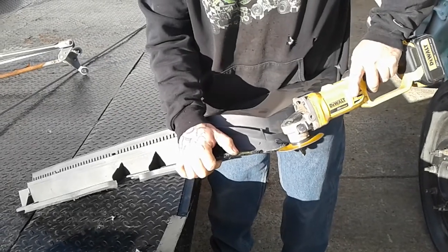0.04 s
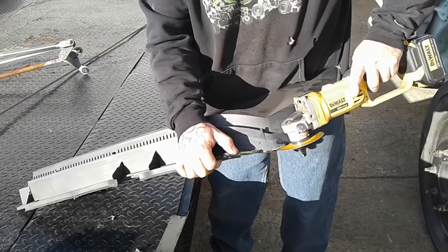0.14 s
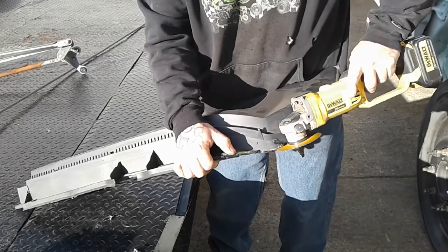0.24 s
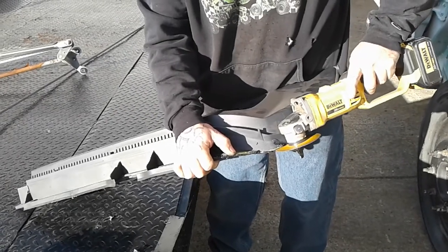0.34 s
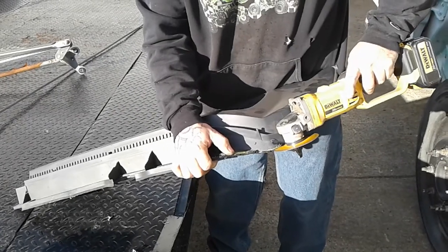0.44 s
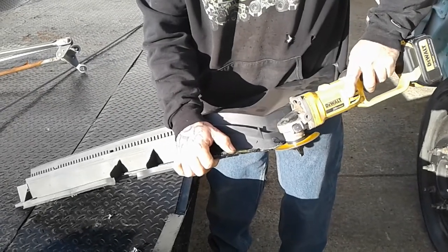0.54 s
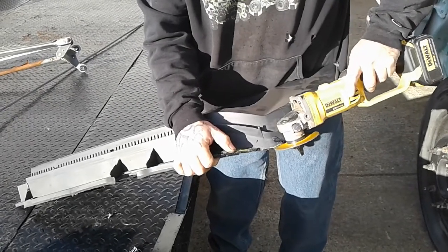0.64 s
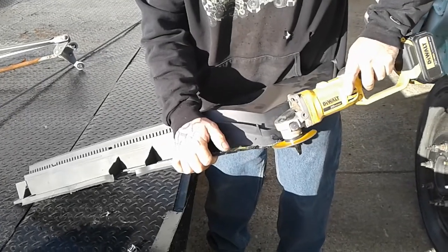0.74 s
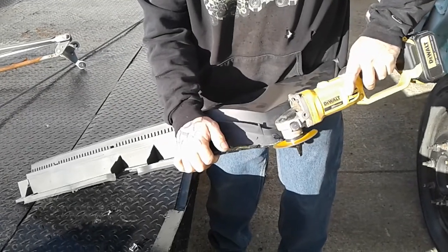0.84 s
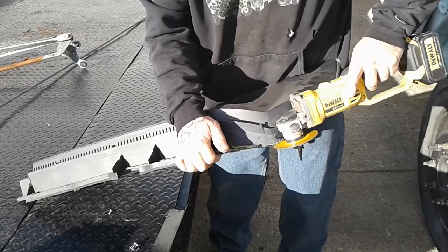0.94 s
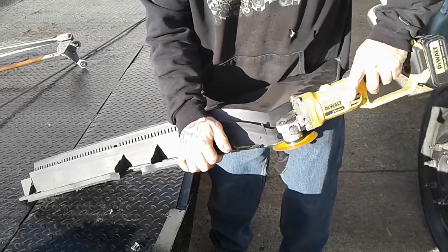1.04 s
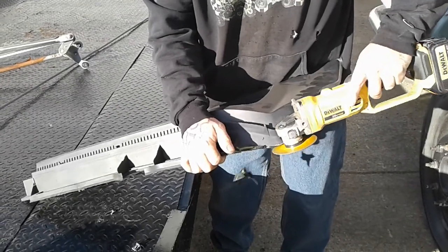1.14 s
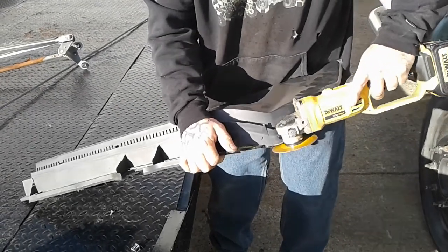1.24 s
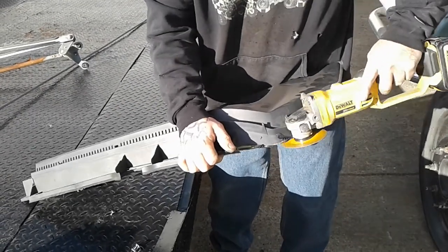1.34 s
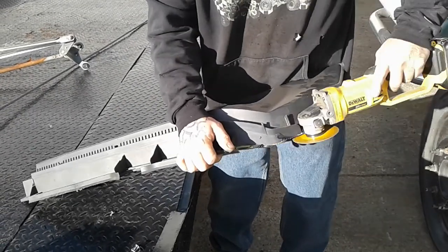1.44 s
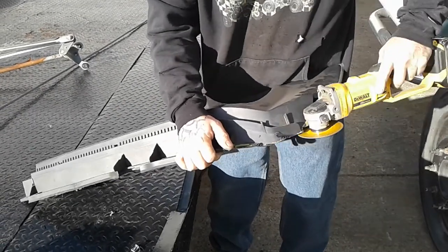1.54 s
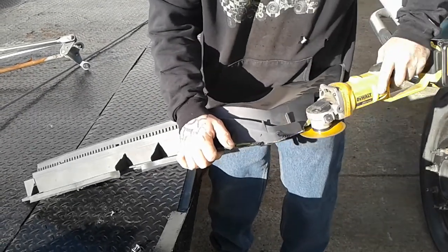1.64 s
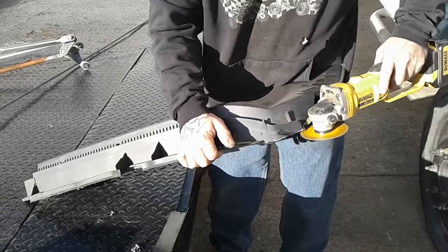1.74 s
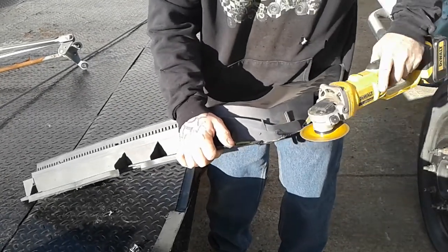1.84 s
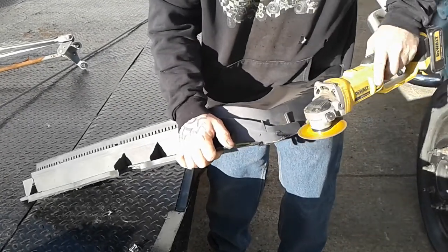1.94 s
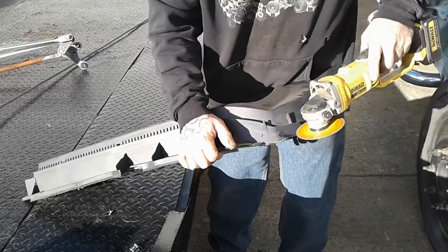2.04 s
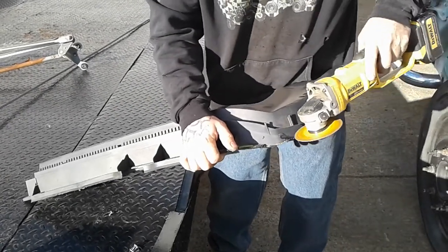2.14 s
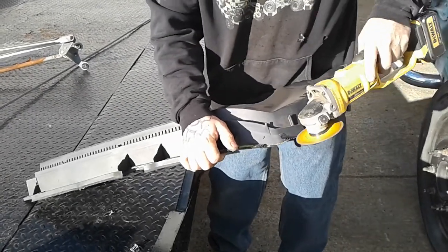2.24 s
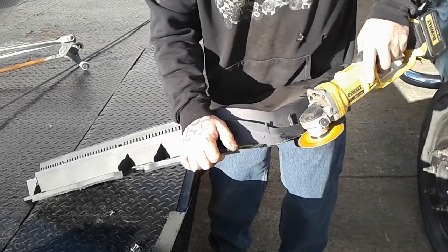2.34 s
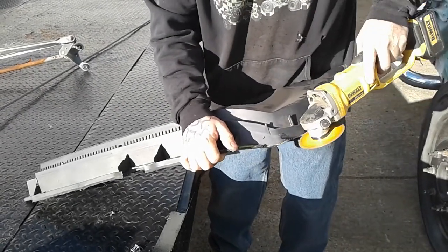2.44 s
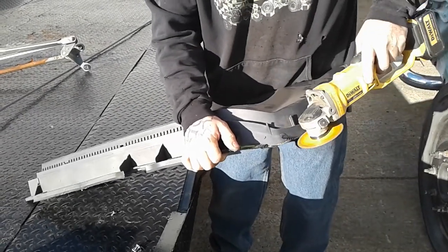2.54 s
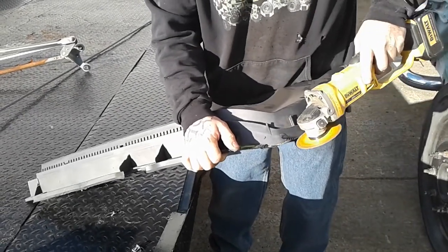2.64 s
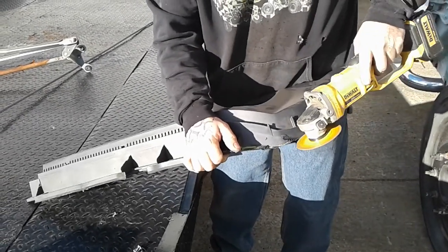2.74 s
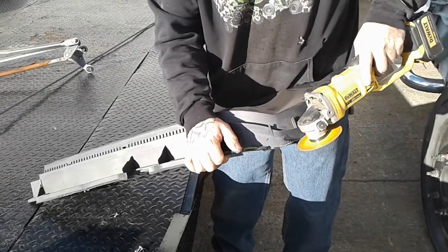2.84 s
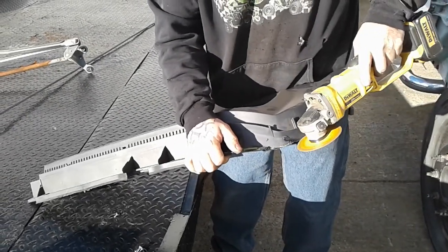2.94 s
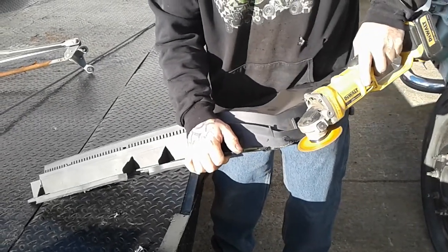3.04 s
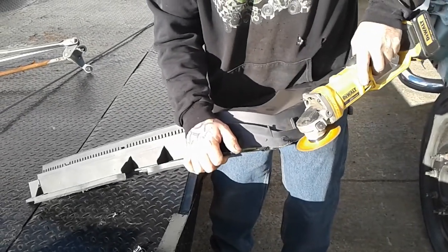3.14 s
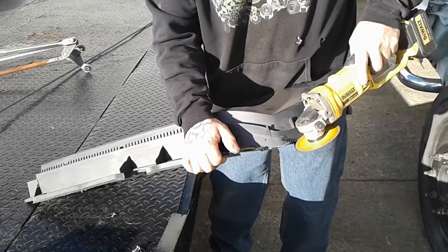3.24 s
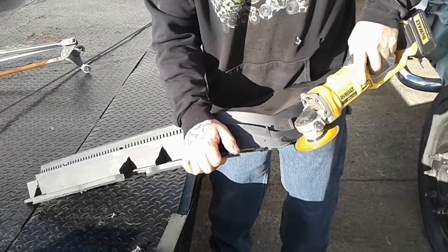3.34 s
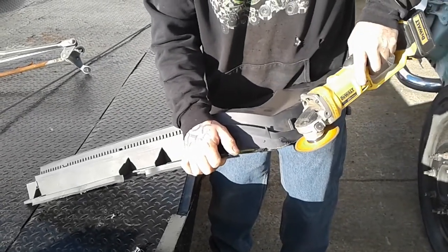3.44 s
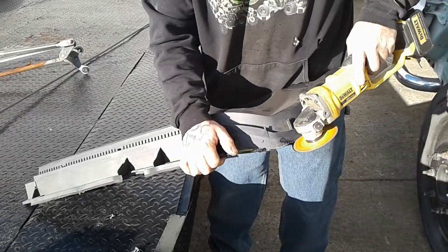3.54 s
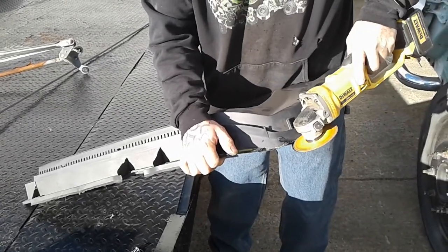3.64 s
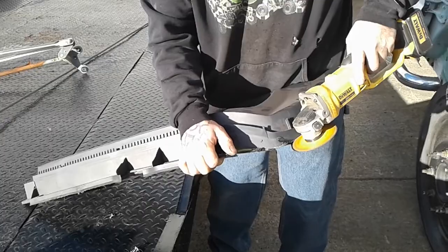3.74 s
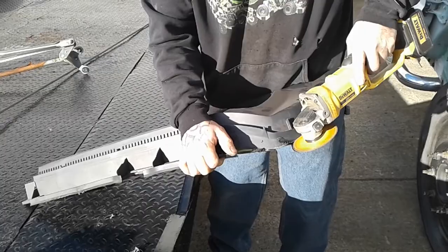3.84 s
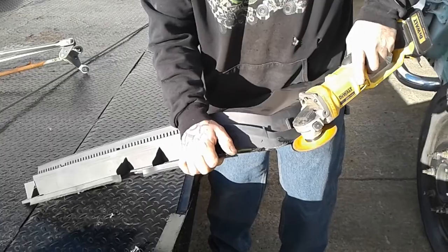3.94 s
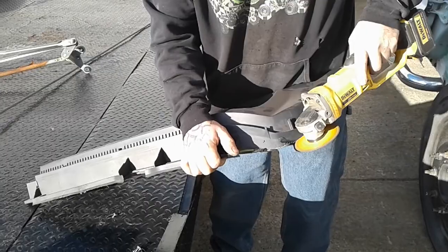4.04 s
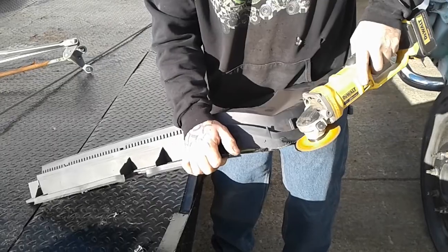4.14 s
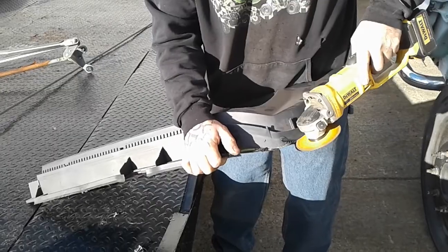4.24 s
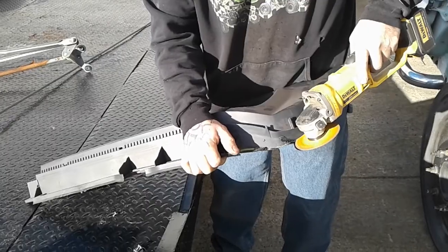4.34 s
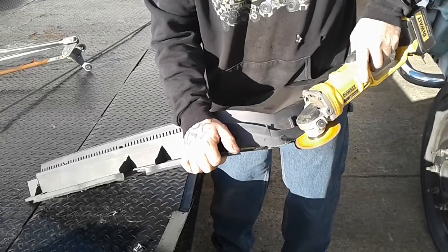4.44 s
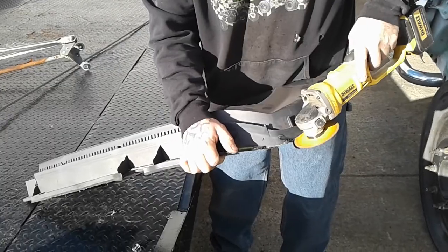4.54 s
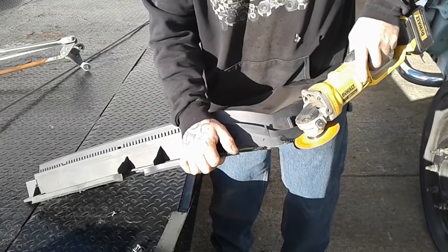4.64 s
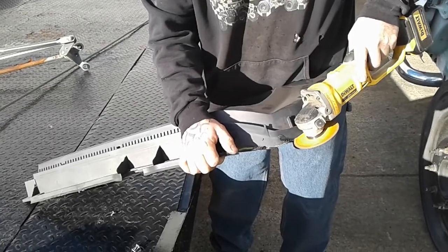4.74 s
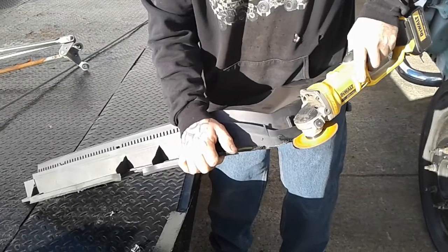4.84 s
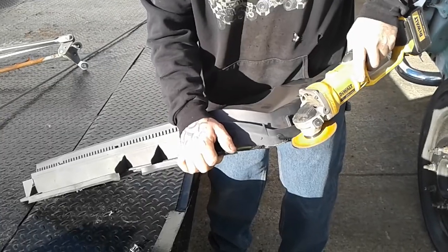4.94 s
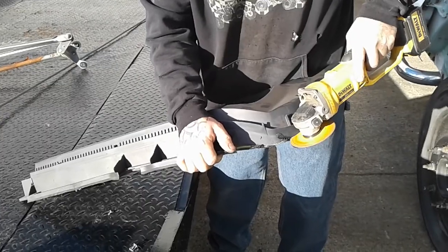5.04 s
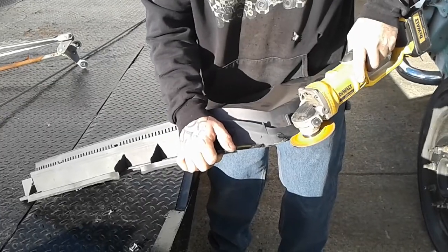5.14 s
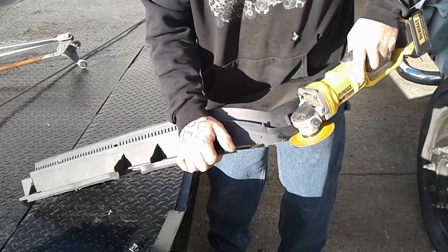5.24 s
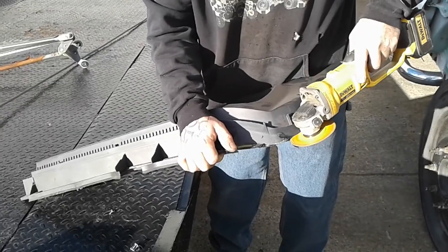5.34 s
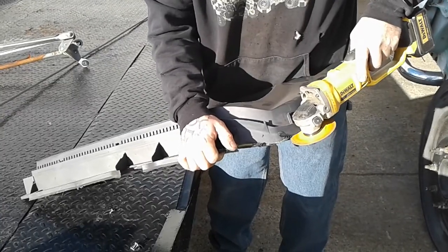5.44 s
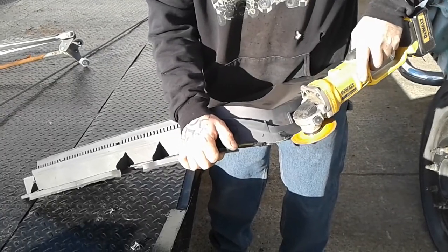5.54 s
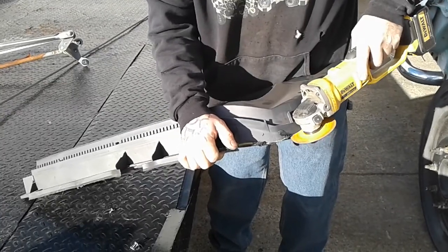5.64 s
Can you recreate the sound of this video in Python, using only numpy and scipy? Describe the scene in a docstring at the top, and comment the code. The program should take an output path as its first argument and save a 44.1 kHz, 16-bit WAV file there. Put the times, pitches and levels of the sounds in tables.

```python
"""First a harsh buzz and hiss: outdoors, a cordless angle grinder cuts a plastic panel, runs free, then bites again.
The uneven rim rubs one pattern into the panel every turn, and load sags the speed that sets every pitch.
Torn plastic rasps, swarf hisses and ticks, the cut edge rings, gears and motor whine, the fan blows and whistles.
Off the panel the gears rattle, the rim scuffs and ticks on the edge, and a thin ring chirps.
Two microphone ports hear it with near reflections; a breeze bumps both, the left one harder."""
import sys
import numpy as np
from scipy import signal
from scipy.fft import rfft, irfft
from scipy.io import wavfile
from scipy.ndimage import uniform_filter1d, map_coordinates

SR = 44100
rng = np.random.default_rng(int(sys.argv[2]) if len(sys.argv) > 2 else 0)


def master_out(mix):
    """Clip the mix to full scale and print it as 16-bit PCM to the path in sys.argv[1]."""
    frames = np.transpose(np.atleast_2d(mix))
    ceiling = np.clip(frames, -1, 1)
    pcm = np.round(ceiling * 32767).astype(np.int16)
    wavfile.write(sys.argv[1], SR, pcm)


N = 251370
TIME = np.arange(N) / SR
BINS = np.fft.rfftfreq(N, 1 / SR)

# Course of the disc's speed, before inertia rounds it. Each row: time in seconds, turns per second.
SPEED_COURSE = [(0, 83.5), (.42, 93.4), (.68, 91.3), (.8, 89.8), (.99, 90.3), (1.28, 99.9), (1.6, 104.2),
                (2.15, 106.4), (2.52, 104.7), (2.8, 102.0), (3.51, 87.6), (3.82, 85.25), (4.14, 86.0),
                (4.54, 87.55), (4.92, 86.15), (5.29, 80.0), (5.7, 81.3)]
# The rotor's inertia rounds speed changes; load is 0 at the free rate, 1 at the loaded rate (turns per second).
INERTIA_S, FREE_RATE, LOADED_RATE = .1, 106, 86
# Disc in the panel. Each row: start in seconds, end in seconds.
CUTS = [(0.0, 1.095), (2.503, 5.7)]

# How well the panel radiates. Each row: frequency in Hz, relative level in dB.
PANEL_RESPONSE = [(85, -37.7), (170, -26), (770, -26), (1020, -3.0), (1250, -8.4), (1480, -4.8),
                  (1680, -20.6), (2000, -5.0), (2450, 0.0), (2780, -7.7), (3020, -5.3), (3550, -10.5),
                  (4000, -17.1), (12000, -36.0)]
# What stands out of the rim's pattern in each hold of the disc. Each row: multiple of the turn, lift in dB.
FIRST_CUT_LINES = [(9, 6), (11, -3), (12, -3), (17, 4), (18, 6), (21, -5), (22, -5), (23, 2), (24, 3),
                   (25, -4), (27, 7), (28, 2), (30, -5), (34, 1), (35, -5)]
BITING_IN_LINES = [(12, 5), (15, 4), (16, -8), (17, 7), (18, 6), (19, -8), (20, -5), (21, -8), (23, 5),
                   (24, 3), (25, 2), (26, -6), (27, -4), (28, -4), (29, 10), (30, 5), (31, -6), (41, 6),
                   (42, 9)]
SINKING_LINES = [(6, 7), (8, 8), (9, -4), (12, 3), (13, 11), (14, -5), (15, 8), (20, 4), (22, -8), (23, 3),
                 (24, 3), (25, 2), (28, -13), (29, -7), (30, -4), (34, -8), (35, -7), (36, -7)]
CHEWING_LINES = [(7, 4), (10, -10), (13, 2), (14, -5), (15, -8), (16, 3), (17, 3), (23, 4), (24, 4),
                 (27, 4), (28, -14), (31, -4), (33, -5), (36, -3), (37, -8), (38, 5), (41, -4), (43, -6)]
DEEP_CUT_LINES = [(10, -14), (12, 4), (14, 2), (17, 6), (18, 3), (21, -4), (23, 6), (25, -2), (26, -5),
                  (27, -4), (28, -4), (29, 4), (30, 6), (31, -4), (33, -4), (34, -5), (35, -4), (36, 4),
                  (37, 3), (41, 9), (43, -7), (44, -8)]
DRAGGING_LINES = [(11, 4), (12, 8), (13, 4), (14, 7), (16, -12), (20, 6), (22, 4), (23, 13), (24, -5),
                  (25, 2), (27, 5), (29, 6), (35, 3), (38, -6), (40, 5), (46, 9)]
SLIPPING_LINES = [(8, 7), (9, 6), (10, 3), (12, 4), (13, 4), (16, -7), (18, 5), (21, 4), (22, 5), (23, 3),
                  (24, 5), (28, -11), (33, -3), (35, -4), (36, -7), (42, 4)]
WEDGED_LINES = [(11, 5), (13, -4), (16, -3), (17, -7), (19, -5), (23, 5), (25, -6), (27, 4), (28, -13),
                (31, 2), (33, 5), (35, 8), (36, 10), (37, -4), (38, 6), (42, 6), (45, 8), (46, 5)]
HOLD_PATTERNS = [FIRST_CUT_LINES, BITING_IN_LINES, SINKING_LINES, CHEWING_LINES,
                 DEEP_CUT_LINES, DRAGGING_LINES, SLIPPING_LINES, WEDGED_LINES]
# Way the disc is held. Each row: time in seconds, hold as an index into HOLD_PATTERNS (fractions blend),
# share of the turn in contact (0-1).
HOLD_COURSE = [(0, 0, .65), (.25, 0, .42), (.58, 0, .45), (.75, 0, .65), (1.15, 0, .8), (2.5, 1, .3),
               (2.76, 1, .33), (2.98, 2, .58), (3.28, 2, .6), (3.44, 3, .7), (3.66, 3, .88), (3.84, 4, .88),
               (4.15, 4, .85), (4.34, 5, .65), (4.68, 5, .62), (4.82, 6, .7), (5.02, 6, .75),
               (5.26, 7, .62), (5.7, 7, .72)]
# How hard the hand presses, one curve a cut. Each row: time in seconds, buzz level in dB before its trim.
PRESS_CURVES = [
    [(0.0, -20), (0.25, -16), (0.47, -15), (.7, -17), (0.88, -19), (1.02, -21.5), (1.1, -26)],
    [(2.52, -16), (2.66, -15), (2.86, -18), (3.1, -16), (3.55, -14.5), (3.97, -13), (4.3, -15.5),
     (4.6, -13.5), (4.8, -16), (5.05, -18), (5.2, -18), (5.4, -18.5), (5.62, -16), (5.7, -18.5)],
]
# The rim's multiples drift in level (dB) and slip in phase (radians).
DRIFT_DB, SLIP_RAD = 3, .45

# Swarf thrown. Each row: time in seconds, hiss level at load 1 in dB before its trim.
SPRAY_COURSE = [(0, -27), (.14, -25), (.3, -28), (.41, -26), (.47, -23.5), (.8, -25), (.95, -22.5),
                (1.1, -20), (2.5, -26), (2.8, -24), (3.2, -26.5), (3.45, -29), (4.3, -30.5), (4.8, -27),
                (5.7, -29.5)]
# Rasp of torn plastic. Each row: frequency in Hz, relative level in dB per Hz.
RASP_SPECTRUM = [(100, -39), (250, -17.5), (720, -6.5), (900, -5.5), (1480, -3), (1700, -10), (2100, -4.5),
                 (2450, 2), (2750, -3.5), (3050, -13), (4000, -35), (12000, -25.5)]
# Hiss of swarf. Each row: frequency in Hz, relative level in dB per Hz.
HISS_SPECTRUM = [(2120, -52), (3600, -14), (3800, 0.5), (4520, 7.5), (7190, -3), (7830, -1.5),
                 (8960, -12.5), (10900, -12), (12500, -17), (14500, -25), (15600, -40)]
# Load raises the hiss; its top is lifted, and brightens further for a while after each bite.
HISS_LOAD_DB, HISS_TOP_DB, BRIGHTEN_DB_PER_S, BRIGHTEN_S = 12, 7, 3, 1
# As the disc slides out of the first cut, rasp and hiss body fade while the hiss top lifts.
EXIT_S, EXIT_DB, EXIT_TOP_DB = 0.19, -12, 3.5
# Narrow sliding rings of the cut edge. Each row: start in seconds, length in seconds, first Hz, last Hz, level in dB.
EDGE_RING_EVENTS = [(0, .13, 5300, 5100, -32), (0, .25, 7900, 7900, -38), (.42, .3, 6300, 6700, -34),
                    (.9, .12, 6600, 6750, -33), (.55, .5, 9400, 9600, -41), (2.52, .62, 4330, 4300, -34),
                    (2.7, .35, 7050, 6800, -40), (2.72, .3, 12000, 11900, -48), (3.1, 1.6, 5750, 5750, -35),
                    (3.85, .6, 8100, 7800, -38), (4.7, .5, 8500, 7750, -37), (5.25, .45, 7700, 7850, -35),
                    (5.08, .55, 4250, 4200, -31), (4.75, .95, 10100, 9800, -42)]

# Hum of the loose panel. Each row: multiple of the turn, level in dB.
PANEL_HUM = [(2, -54), (3, -59), (4, -50)]
# The hum swells to a drone. Each row: start in seconds, length in seconds, multiple of the turn, level in dB.
DRONE_EVENTS = [(0.0, 0.54, 4, -45.5), (0.6, 0.39, 4, -68), (0.05, 0.47, 3, -47.5), (2.452, 0.21, 3, -49),
                (2.803, 1, 4, -50), (3.88, 0.36, 4, -41.5), (4.694, 1.0, 2, -49.5), (5.08, 0.06, 2, -38.5),
                (5.29, 0.36, 3, -49.5)]

# Fan air. Each row: frequency in Hz, relative level in dB per Hz.
FAN_SPECTRUM = [(100, -69), (300, -13), (720, -7.5), (1000, 8), (1200, 0.5), (1520, -1.5), (1780, -8),
                (2300, 4.5), (3400, 8.5), (4300, -6.5), (5500, -8), (9000, -16.5), (12000, -23),
                (15500, -31)]
# Pitch of the fan's whistle, as a multiple of the disc's turn.
WHISTLE_MULTIPLE = 9.73
# Mesh of the crown gear's 32 teeth, pressed together by the load.
# Each row: multiple of the turn, level running free in dB, level at load 1 in dB.
GEAR_TONES = [(32, -40, -34), (64, -58, -49), (96, -66, -56)]
# Motor tones. Each row: multiple of the disc's turn, level running free in dB, level at load 1 in dB.
MOTOR_TONES = [(24.889, -56, -44), (28.444, -50, -38), (60.444, -68, -58), (85.333, -57, -58)]
# One multiple of gear mesh or rim sings out.
# Each row: start in seconds, length in seconds, multiple of the turn, level in dB.
SQUEAL_EVENTS = [(0.0, 0.043, 23, -25), (0.0, 0.05, 29, -21), (0.208, 0.07, 32, -26),
                 (0.654, 0.16, 32, -26), (0.62, 0.12, 34, -35), (0.884, 0.15, 34, -25.5),
                 (1.043, 0.17, 32, -31), (2.557, 0.052, 29, -20), (2.717, 0.28, 32, -27),
                 (2.952, 0.11, 32, -23.5), (3.21, 0.14, 32, -22), (3.83, 0.19, 32, -30),
                 (3.85, 0.13, 64, -36), (4.22, 0.09, 60, -35), (4.392, 0.15, 66, -34),
                 (4.954, 0.11, 32, -23.5), (4.957, 0.032, 64, -28), (5.153, 0.022, 64, -23),
                 (5.258, 0.45, 32, -23), (5.31, 0.092, 64, -29), (5.13, 0.63, 96, -43)]
# Gear rattle. Each row: frequency in Hz, relative level in dB per Hz.
RATTLE_SPECTRUM = [(300, -25), (1800, -9), (2400, -23), (2900, 6.5), (3400, 14), (3900, -1), (4600, 7),
                   (5300, -12), (6800, 1), (8000, -13.5), (11600, -14), (15000, -45)]
# Teeth rattle in their play while free. Each row: start in seconds, length in seconds, level in dB.
FREE_RATTLE_BURSTS = [(1.173, 0.059, -26.5), (1.347, 0.087, -26), (1.576, 0.081, -26), (1.695, 0.19, -32.5),
                      (1.92, 0.13, -30), (2.09, 0.58, -27)]
# Once-a-turn knock (depth 0-1), and the quick rise and fall of each burst.
RATTLE_KNOCK, RATTLE_RISE_S, RATTLE_FALL_S = .3, .018, .02
# Slower throb of the rattle: cycles per turn, depth 0-1, rms unevenness in cycles.
SWAY_PER_TURN, SWAY_DEPTH, SWAY_SLIP = .27, .35, .2

# Strength of the breeze. Each row: time in seconds, level in dB before each port's trim.
BREEZE_COURSE = [(0.0, -46), (1.05, -56), (1.2, -48), (2.3, -51.5), (2.5, -55.5), (4.2, -66.5), (5.7, -62)]
# Gusts on top of it. Each row: start in seconds, length in seconds, level in dB before each port's trim.
GUST_EVENTS = [(0.07, 0.14, -36.5), (0.442, 0.086, -35.5), (0.798, 0.068, -36.5), (1.436, 0.022, -45),
               (4.866, 0.23, -51.5)]
# Buffeting at the microphone. Each row: frequency in Hz, relative level in dB per Hz.
BUFFET_SPECTRUM = [(20, -28), (45, -5), (80, 1), (150, 4.5), (250, -2), (400, -2.5), (800, -11),
                   (2000, -60)]
# Faint outdoor rumble. Each row: frequency in Hz, relative level in dB per Hz.
OUTDOORS_SPECTRUM = [(25, -20), (60, 8.5), (100, 16), (200, -8), (400, 8), (1000, 2.5), (4000, -50)]

# Grazes of the edge between cuts. Each row: start in seconds, length in seconds, level in dB.
SCUFF_EVENTS = [(1.102, 0.033, -27), (1.17, 0.029, -33), (1.22, 0.022, -29), (1.35, 0.053, -29),
                (1.383, 0.026, -25.5), (1.618, 0.017, -21), (1.754, 0.0083, -17), (1.783, 0.038, -28.5),
                (2.084, 0.011, -30), (2.15, 0.0092, -25), (2.264, 0.013, -27.5), (2.342, 0.025, -17),
                (2.404, 0.043, -24), (2.472, 0.027, -23)]
# Colour of a graze. Each row: frequency in Hz, relative level in dB per Hz.
SCUFF_SPECTRUM = [(180, -57), (300, -7), (720, -2), (1050, 10.5), (1490, 17.5), (1670, 0.5), (2370, 18),
                  (2980, -1), (3350, 12.5), (4010, 8.5), (4290, 16), (5400, 3.5), (6370, 7), (10300, 1),
                  (15600, -12)]
# Bouts of chirping. Each row: start in seconds, length in seconds, level in dB.
CHIRP_BOUTS = [(1.434, 0.066, -46), (1.58, 0.066, -42), (1.71, .025, -42), (1.796, .05, -41),
               (1.91, .035, -46), (2, 0.034, -37), (2.087, .02, -41), (2.146, 0.025, -41),
               (2.197, 0.021, -37), (2.265, .025, -40), (2.32, .02, -40)]
# Sharp single ticks of the rim on the edge. Each row: time in seconds, level in dB.
TICK_EVENTS = [(1.462, -27), (1.482, -17.5), (1.544, -28), (1.622, -30), (1.637, -19), (1.712, -24),
               (1.759, -27), (2.086, -18), (2.124, -17), (2.146, -15.5), (2.243, -16), (2.264, -20),
               (2.309, -15)]
# Colour of a tick. Each row: frequency in Hz, relative level in dB per Hz.
TICK_SPECTRUM = [(300, -28), (1000, -7), (1800, -3), (2400, 8), (3400, 9), (4500, 6.5), (5500, -31),
                 (10000, -15), (15000, -34)]

# Balance of the two microphone ports. Each row: frequency in Hz, left minus right in dB.
PORT_PAN = [(100, 0.5), (500, 0), (800, 2.6), (1200, 4), (1800, -2.5), (2500, 0), (3300, -3), (4400, -9),
            (5600, -11), (7400, -15), (8700, -6), (10200, -7), (11800, -1), (14500, -5)]
# Phase between the ports. Each row: frequency in Hz, lead of the left in radians.
PORT_LEAD = [(100, -0.11), (1500, -0.43), (1900, -1.6), (2150, -0.97), (2750, -0.69), (3200, -1.58),
             (3900, -1.5), (7800, -1.37), (12000, -1.76)]
# Likeness of noise at the ports. Each row: frequency in Hz, likeness 0-1.
PORT_LIKENESS = [(100, 1), (1000, 0.87), (2500, 0.52), (4000, 0.19), (8000, 1), (15000, 0.76)]
# Upper band limit of the recorder.
BAND_LIMIT_HZ = 15750


def amp(db):
    """Decibels to gain."""
    return 10 ** (np.asarray(db) / 20)


def unit(x):
    """Scales to rms 1."""
    return x / np.sqrt(np.mean(x ** 2) + 1e-20)


def at_hz(points, hz):
    """Reads a spectrum on a log-frequency axis."""
    f, value = np.transpose(points)
    return np.interp(np.log(hz + 1), np.log(f + 1), value)


def at_time(rows, t=TIME):
    """Reads every column of a curve."""
    s, *columns = np.transpose(rows)
    return [np.interp(t, s, c) for c in columns]


def wander(rate, t=TIME):
    """Smooth chance of rms 1 that changes about rate times a second."""
    knots = rng.standard_normal(2048)
    steps = np.linspace(0, t[-1], min(len(t), 8192))
    curve = map_coordinates(knots, [steps * rate], order=2, mode="wrap")
    return unit(np.interp(t, steps, curve))


def swell(start, length, rise, fall):
    """Rises to 1 by start, holds for length, falls back to 0."""
    return np.clip(1 + np.minimum((TIME - start) / rise, (start + length - TIME) / fall), 0, 1)


def coloured(x, spectrum):
    """Gives x a spectrum, at rms 1."""
    return unit(irfft(rfft(x) * amp(at_hz(spectrum, BINS)), N))


def air(spectrum, drive=1):
    """Two partly alike channels of coloured noise whose strength follows drive."""
    a, b = rfft(rng.standard_normal((2, N)) * drive)
    alike = np.clip(at_hz(PORT_LIKENESS, BINS), 0, 1)
    side = b * np.sqrt((1 - alike) / (1 + alike))
    return coloured(irfft(np.array([a + side, a - side]), N), spectrum)


def speed():
    """Turns of the disc per second, rounded by the rotor's inertia."""
    return uniform_filter1d(at_time(SPEED_COURSE)[0], round(INERTIA_S * SR), mode="nearest")


def load():
    """How far the cut drags the speed down."""
    return np.maximum(FREE_RATE - speed(), 0) / (FREE_RATE - LOADED_RATE)


def disc_turns(jitter=0.00043, jitter_rate=45):
    """Angle of the disc in turns; small chance variations shake its speed."""
    return np.cumsum(speed() * (1 + jitter * wander(jitter_rate))) / SR


def contact(bite_s=0.008, lift_s=0.055):
    """1 while the disc is in the cut, 0 while it runs free."""
    return sum(swell(start, end - start, bite_s, lift_s) for start, end in CUTS)


def swarf_db():
    """Level of the abrasive hiss before its trim: it follows the spray, and load raises it."""
    return at_time(SPRAY_COURSE)[0] + HISS_LOAD_DB * (load() - 1)


def tone(turns, multiple, flutter=0.29, flutter_rate=40, shake_turns=0.0011, shake_rate=90):
    """One multiple of the turn, at rms 1; the shaft's shake blurs the high multiples most."""
    angle = turns + shake_turns * wander(shake_rate)
    return unit((1 + flutter * wander(flutter_rate)) * np.sin(2 * np.pi * multiple * angle))


def swelling(turns, steady, events, edge_s):
    """Multiples of the turn, each with a base gain and with swells that add their power to it."""
    power = {round(k): gain ** 2 for k, gain in steady}
    for start, length, k, db in events:
        event_gain = amp(db) * swell(start, length, edge_s, edge_s)
        power[round(k)] = power.get(round(k), 0) + event_gain ** 2
    return sum(np.sqrt(p) * tone(turns, k) for k, p in power.items())


def chips(per_s, decay_s):
    """Chips break off at random moments; each is a sudden kick that dies away."""
    kicks = (rng.random(N) < per_s / SR) * np.minimum(rng.exponential(1, N), 2)
    return signal.lfilter([1], [1, -np.exp(-1 / (decay_s * SR))], kicks + 1e-12)


def rim_buzz(turns, level_db=-1, treble_drift_db=7, treble_db=3, blur=1.0, blur_rate=40,
             drift_rate=4, slip_rate=12, shake=0.028, count=110, size=2048):
    """The rim's pattern repeats each turn and drifts; its multiples sweep through the panel's resonances."""
    t = TIME[::441]  # a fresh pattern every 10 ms
    order = np.arange(1, count + 1)
    hz = order[:, None] * np.interp(t, TIME, speed())
    hold, share = at_time(HOLD_COURSE, t)
    cut_db = at_time(np.vstack(PRESS_CURVES), t)[0]
    db = at_hz(PANEL_RESPONSE, hz)
    for i, pattern in enumerate(HOLD_PATTERNS):
        weight = np.maximum(1 - abs(hold - i), 0)
        for multiple, lift_db in pattern:
            db[round(multiple) - 1] += lift_db * weight
    # the finest features, above about 4 kHz, drift furthest and speak when much swarf is torn
    fine = 1 / (1 + (4000 / hz) ** 8)
    db += (DRIFT_DB + treble_drift_db * fine) * np.tanh([wander(drift_rate, t) for _ in order])
    swarf = np.interp(t, TIME, swarf_db())
    db += fine * (treble_db + swarf - swarf.mean())
    # a brief touch per turn keeps neighbouring multiples in step; a long contact scatters them
    steps = np.concatenate([rng.permutation(np.linspace(-.43, .43, 5)) for _ in order[::5]])
    phase = 2 * np.pi * np.cumsum(steps[:count, None], 0) * share
    phase += SLIP_RAD * np.array([wander(slip_rate, t) for _ in order])
    # the finest features, and all of them under a light touch, are blurred
    blurred = np.maximum(fine, 0.89 * (1 - share))
    phase += blur * blurred * np.array([wander(blur_rate, t) for _ in order])
    # the lowest multiples belong to the flapping, the 32nd to the gears
    kept = ~np.isin(order, [1, 2, 3, 4, 32])[:, None]
    lines = amp(db) * np.exp(1j * phase) * kept
    one_turn = irfft(np.vstack([0 * t, lines]).T, size)
    one_turn *= (amp(cut_db) / one_turn.std(axis=1))[:, None]
    # read across the table by the disc's angle, down it by time
    row = np.interp(TIME, t, np.arange(len(t)))
    buzz = map_coordinates(one_turn, [row, turns % 1 * size], order=1, mode="grid-wrap")
    return amp(level_db) * buzz * contact() * (1 + shake * wander(150))


def tearing_grit(turns, pulsing=0.5, chip_size=0.76, flake_size=0.36, flutter_db=1):
    """Strength of the tearing: it surges with each turn, most under a light touch, and kicks with each chip."""
    share = at_time(HOLD_COURSE)[1]
    per_turn = np.cos(2 * np.pi * turns) + .5 * np.cos(4 * np.pi * turns)
    surge = np.maximum(1 + pulsing * (1 - share) * per_turn, 0)
    small_chips = chip_size * chips(per_s=370, decay_s=0.000087)
    flakes = flake_size * chips(per_s=82, decay_s=0.00042)
    return surge * amp(flutter_db * wander(90)) * (1 + small_chips + flakes)


def leaving_cut():
    """Rises to 1 as the disc slides out of the first cut, then falls back."""
    return swell(CUTS[0][1], 0, EXIT_S, EXIT_S)


def rasp(grit, level_db=-4.0, deep_db=-1.0, body_deep_db=-8.5):
    """Grit tears the plastic: a rasp in the panel, weaker and thinner in a deep cut."""
    depth = np.minimum(at_time(HOLD_COURSE)[0] / 3, 1)
    press_db = at_time(np.vstack(PRESS_CURVES))[0]
    torn = air(RASP_SPECTRUM, grit) * amp(.5 * (press_db + swarf_db()) + level_db + deep_db * depth)
    body = irfft(rfft(torn) / (1 + (BINS / 1900) ** 8), N)  # below about 1.9 kHz
    thinned = torn - body + body * amp(body_deep_db * depth)
    return thinned * amp(EXIT_DB * leaving_cut()) * contact()


def swarf_hiss(grit, level_db=-1):
    """Thrown swarf hisses and ticks; the top brightens after each bite."""
    hiss = air(HISS_SPECTRUM, grit) * amp(swarf_db() + level_db)
    top = irfft(rfft(hiss) / (1 + (8000 / (BINS + 1)) ** 6), N)  # above about 8 kHz
    since_bite = sum((TIME - start) * (TIME >= start) * (TIME < end + EXIT_S) for start, end in CUTS)
    leaving = leaving_cut()
    brighten_db = BRIGHTEN_DB_PER_S * np.minimum(since_bite, BRIGHTEN_S)
    top_db = HISS_TOP_DB + brighten_db + EXIT_TOP_DB * leaving
    return ((hiss - top) * amp(EXIT_DB * leaving) + top * amp(top_db)) * contact()


def edge_rings(grit, width_share=0.055, edge_s=0.1):
    """Grit excites narrow resonances of the cut edge; they swell and fade, most sliding in pitch."""
    out = np.zeros((2, N))
    scrape = rng.standard_normal((2, N)) * grit
    for start, length, first_hz, last_hz, db in EDGE_RING_EVENTS:
        on = (TIME > start - edge_s) & (TIME < start + length + edge_s)
        hz = np.interp(TIME[on], [start, start + length], [first_hz, last_hz])
        carrier = np.exp(2j * np.pi * np.cumsum(hz) / SR)
        r = np.exp(-np.pi * width_share * first_hz / SR)
        # shift the sliding pitch to zero, low-pass, shift back: a moving resonance
        narrow = signal.lfilter([(1 - r) ** 2], [1, -2 * r, r * r], scrape[:, on] / carrier)
        ring = (carrier * narrow).real
        out[:, on] += amp(db) * swell(start, length, edge_s, edge_s)[on] * unit(ring + ring.mean(0))
    return out * contact()


def flap(turns, edge_s=0.068):
    """The panel's slowest bending follows the first multiples of the turn."""
    hum = [(k, amp(db) * contact()) for k, db in PANEL_HUM]
    return swelling(turns, hum, DRONE_EVENTS, edge_s)


def fan_air(level_db=-25.5):
    """Steady broad rush of the fan."""
    return amp(level_db) * air(FAN_SPECTRUM)


def whistle(turns, level_db=-35.5, load_db=-8, waver_db=2, waver_rate=35, eddy_rate=50, eddy=0.55):
    """The fan's wavering whistle, stronger the faster it spins; eddies roughen its tone."""
    eddies = 1 + eddy * (wander(eddy_rate) + 1j * wander(eddy_rate))
    note = unit((eddies * np.exp(2j * np.pi * WHISTLE_MULTIPLE * turns)).real)
    return note * amp(level_db + load_db * load() + waver_db * wander(waver_rate))


def whine(turns, edge_s=0.073):
    """Load strengthens the gear tones and most motor tones; single multiples swell into squeals."""
    strain = np.minimum(load(), 1)
    gears = [(k, amp(free + strain * (full - free))) for k, free, full in GEAR_TONES]
    motor = sum(amp(free + strain * (full - free)) * tone(turns, k) for k, free, full in MOTOR_TONES)
    return motor + swelling(turns, gears, SQUEAL_EVENTS, edge_s)


def gear_rattle(turns, level_db=-34, loaded_db=-10, throb_db=2, throb_rate=110):
    """Teeth rattle in their play, faintly in the cut and in bursts when the load is off."""
    knocks = amp(throb_db * wander(throb_rate)) * (1 + RATTLE_KNOCK * np.cos(2 * np.pi * turns))
    sway_cycles = SWAY_PER_TURN * turns + SWAY_SLIP * wander(8.25)
    knocks = knocks * (1 + SWAY_DEPTH * np.sin(2 * np.pi * sway_cycles))
    bursts = sum(amp(db) * swell(start, length, RATTLE_RISE_S, RATTLE_FALL_S)
                 for start, length, db in FREE_RATTLE_BURSTS)
    steady = amp(level_db + loaded_db * contact())
    return np.hypot(steady, bursts) * air(RATTLE_SPECTRUM, knocks)


def breeze(left_db=7, right_db=-5, lumpy_db=0.5, gust_rise_s=0.032, gust_fall_s=0.075):
    """Lumpy wind noise and gusts: one strength, but unrelated noise at the two ports."""
    lumps = amp(lumpy_db * wander(45))
    buffet = coloured(rng.standard_normal((2, N)) * lumps, BUFFET_SPECTRUM)
    gusts = sum(amp(db) * swell(start, length, gust_rise_s, gust_fall_s) for start, length, db in GUST_EVENTS)
    strength = np.hypot(amp(at_time(BREEZE_COURSE)[0]), gusts)
    return buffet * strength * amp([[left_db], [right_db]])


def outdoors(level_db=-56):
    """Faint steady rumble of the place: low coloured noise."""
    return amp(level_db) * air(OUTDOORS_SPECTRUM)


def scuffs(turns, rise_s=0.0045, fall_s=0.021, pulsing=0.076, chip_size=1.0):
    """Short grazes of the rim on the cut edge, crackling with chips."""
    touch = 0
    for start, length, db in SCUFF_EVENTS:
        fade = np.exp(-np.maximum(TIME - start - length, 0) / fall_s)
        touch = touch + amp(db) * np.clip((TIME - start) / rise_s, 0, 1) * fade
    pulse = 1 + pulsing * np.cos(2 * np.pi * turns)
    crackle = 1 + chip_size * chips(per_s=300, decay_s=0.00072)
    return touch * air(SCUFF_SPECTRUM, pulse * crackle)


def bearing(ring_hz=10450, width_hz=850, chirp_rate=110, edge_s=0.0094):
    """A thin ring, likely a bearing, that chirps in short uneven bouts while the disc runs free."""
    band = 1 / (1 + (2 * (BINS - ring_hz) / width_hz) ** 4)
    ring = unit(irfft(rfft(rng.standard_normal((2, N))) * band, N))
    bouts = sum(amp(db) * swell(start, length, edge_s, edge_s) for start, length, db in CHIRP_BOUTS)
    return ring * bouts * amp(2 * wander(chirp_rate))


def ticks(decay_s=0.0043):
    """The rim clips the edge for an instant: a sudden noise that dies away."""
    strikes = sum(amp(db) * (TIME >= s) * np.exp(-np.clip((TIME - s) / decay_s, 0, 20))
                  for s, db in TICK_EVENTS)
    return air(TICK_SPECTRUM) * strikes


def pair(x):
    """The tool as two ports hear it: a balance and a phase for each frequency."""
    pan = amp(at_hz(PORT_PAN, BINS) / 2)
    lead = np.exp(.5j * at_hz(PORT_LEAD, BINS))
    ports = np.array([pan * lead, 1 / (pan * lead)])
    return irfft(rfft(x) * ports / abs(ports.mean(0)), N)  # a sound common to both keeps its mid level


def yard(x, echo_db=-16, t60=0.1, size=4096):
    """Quick scattered reflections off the steel deck and the ground, different at each port."""
    t = np.arange(size) / SR
    sparse = rng.standard_normal((2, size)) * (rng.random((2, size)) < .03)
    taps = sparse * amp(-60 * t / t60) * (t > .002)
    taps /= np.linalg.norm(taps, axis=1, keepdims=True)
    return x + amp(echo_db) * signal.oaconvolve(x, taps, axes=1)[:, :N]


def scene():
    """The tool and panel share one place and its reflections; the breeze acts on the ports."""
    turns = disc_turns()
    grit = tearing_grit(turns)
    cutting = rim_buzz(turns) + rasp(grit) + swarf_hiss(grit) + edge_rings(grit) + flap(turns)
    grinder = fan_air() + whistle(turns) + whine(turns) + gear_rattle(turns) + bearing()
    tool = cutting + grinder + scuffs(turns) + ticks()
    return yard(pair(tool)) + breeze() + outdoors()


def record(dry):
    """The loudest peaks are rounded off; then the recorder's band limit."""
    rounded = dry / (1 + (dry / .95) ** 8) ** (1 / 8)
    low_pass = signal.firwin(511, BAND_LIMIT_HZ, window=("kaiser", 9), fs=SR)
    return signal.oaconvolve(rounded, low_pass[None], "same")


dry = scene()
out = record(dry)
master_out(out)
```